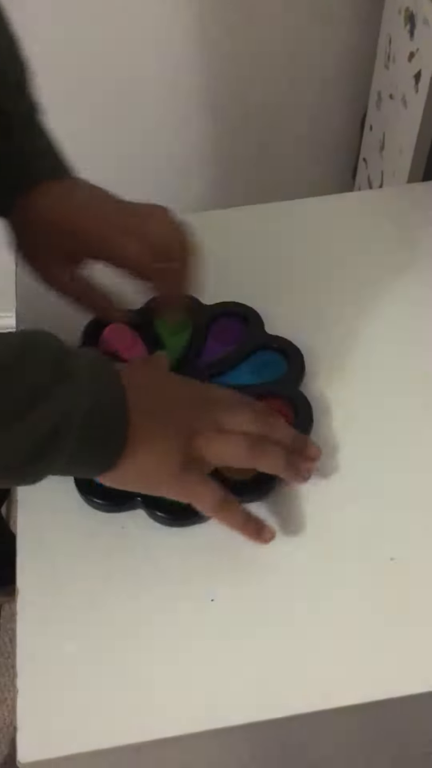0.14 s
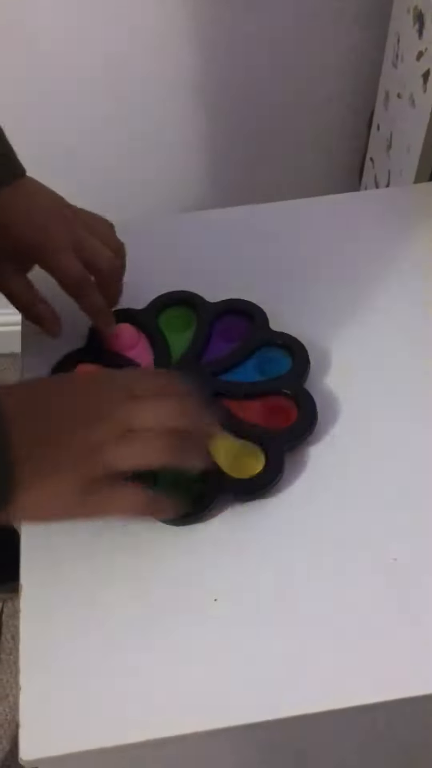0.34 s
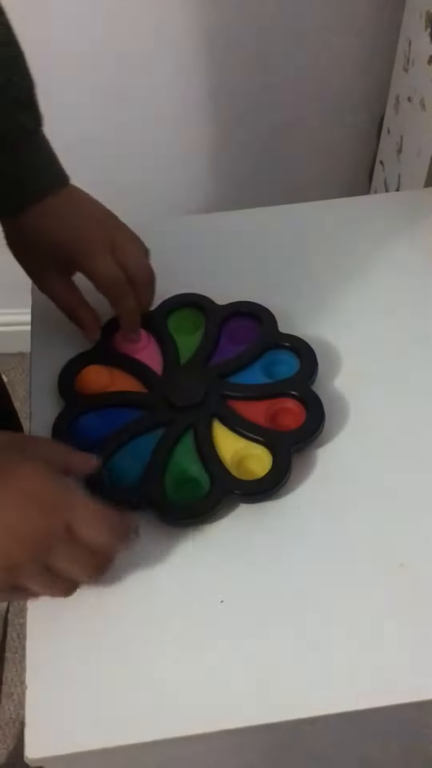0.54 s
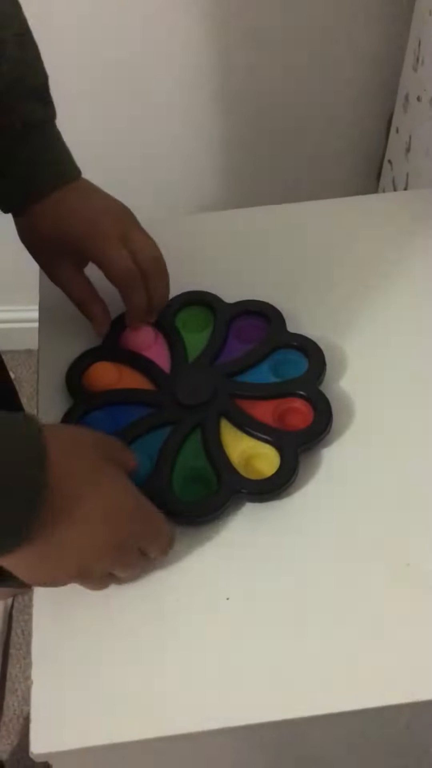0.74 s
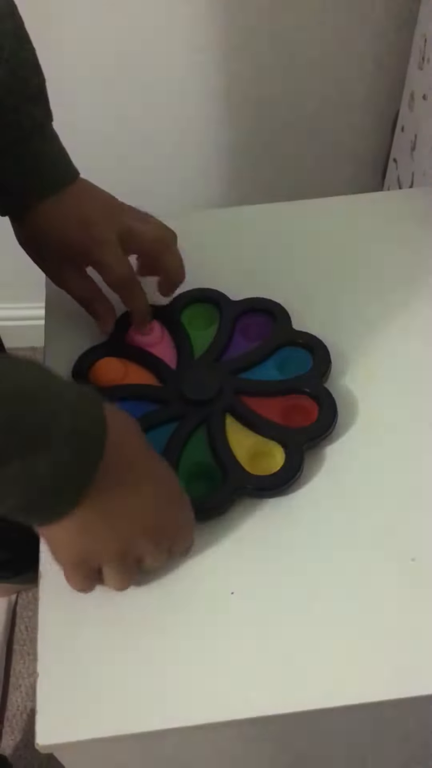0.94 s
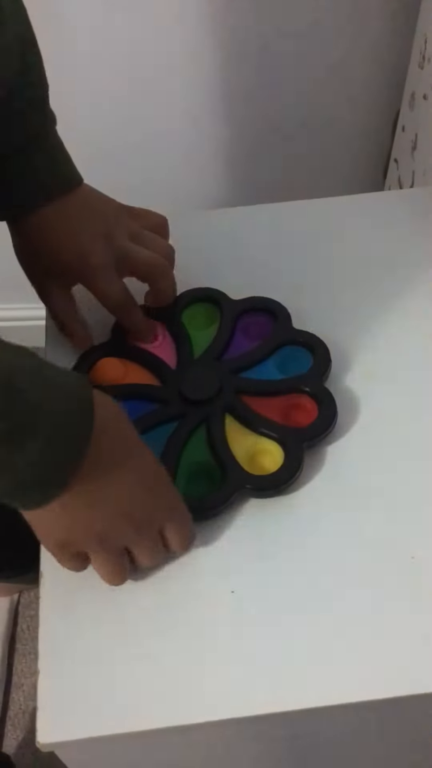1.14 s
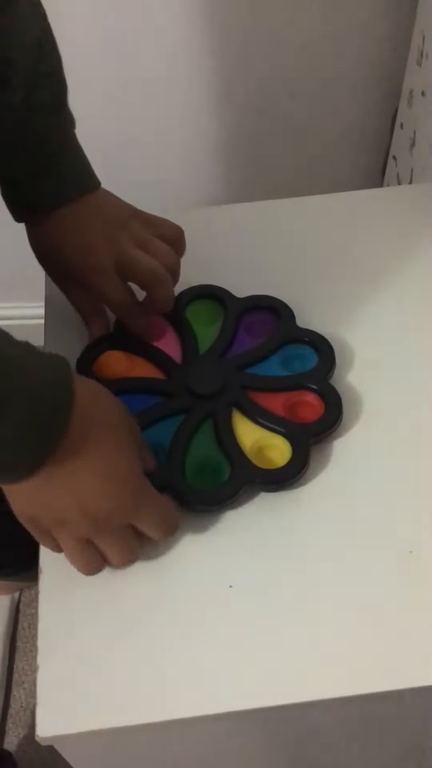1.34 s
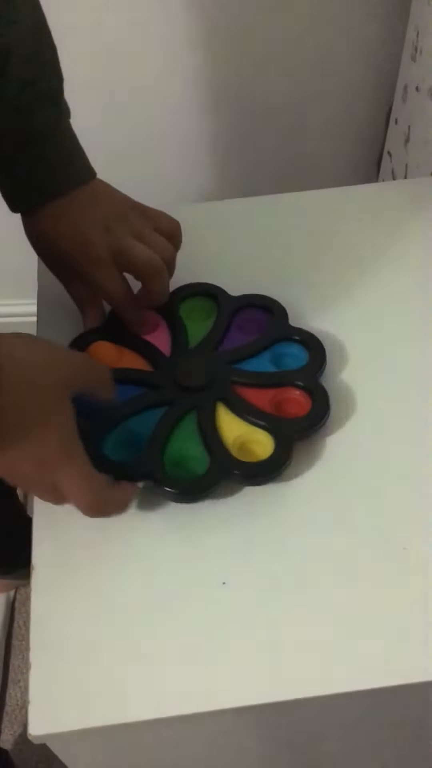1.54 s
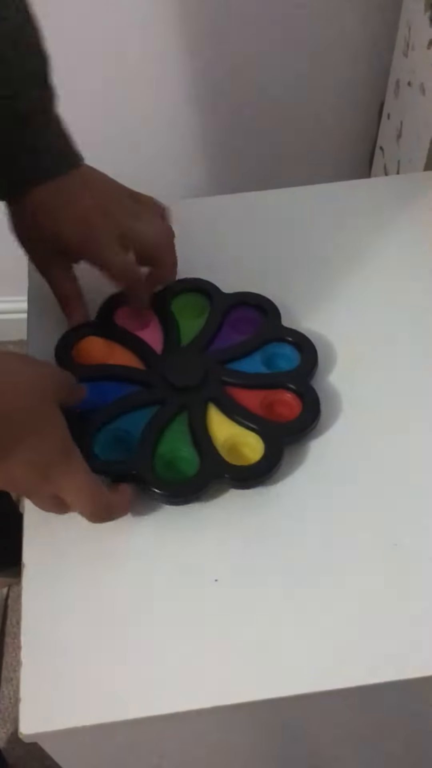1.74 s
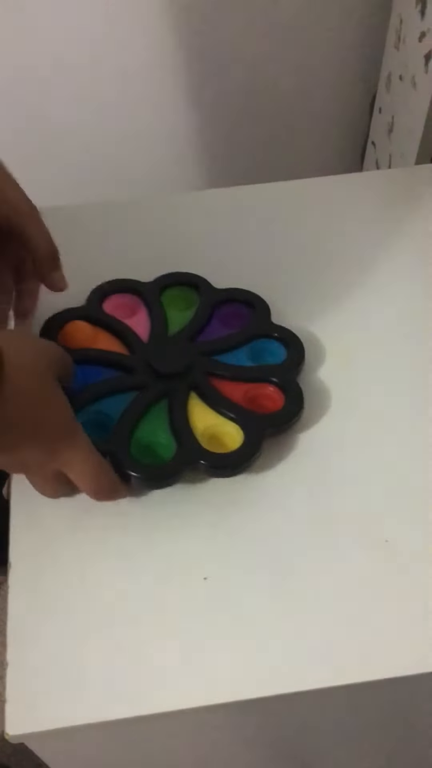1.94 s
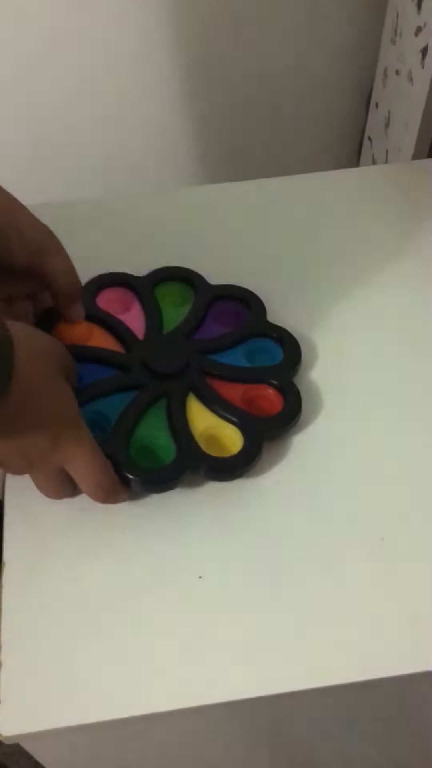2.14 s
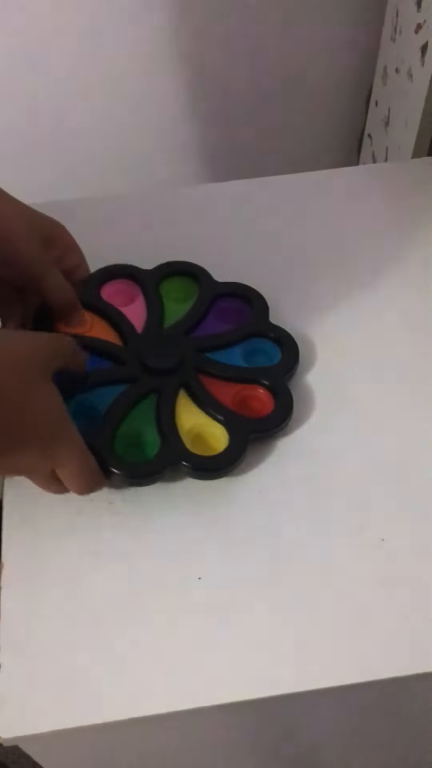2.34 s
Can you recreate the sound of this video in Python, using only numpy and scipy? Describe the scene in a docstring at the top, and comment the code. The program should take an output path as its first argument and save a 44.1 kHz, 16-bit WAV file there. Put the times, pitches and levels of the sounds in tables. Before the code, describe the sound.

Close up indoors, rubbery bubbles snap in an irregular run, early cluster loudest, a near-quiet gap, one strong late pop and quieter last ones; the tabletop booms beneath and skin rubs lightly over faint hiss.

```python
"""Close on a plastic-framed toy lying on a hollow table, in a quiet furnished room, one microphone, 2.5 s.
Room tone and hiss run throughout; the table top faintly hums and skin rubs in filtered noise from the start.
Fingers press silicone bubbles: damped modes pop in a loud flurry at 0.24-0.5 s, softer at 1.0-1.25 s, barely
at 1.75 s, strongly at 2.1 s and quietly near 2.45 s. Noise puffs tick in the frame and decaying low sines
boom in the table around them; faint pops and single slips ring briefly, most often at 1.5-1.9 s."""
import sys
import numpy as np
from scipy import signal
from scipy.fft import rfft, irfft, next_fast_len
from scipy.io import wavfile
from scipy.ndimage import uniform_filter1d

SR = 44100
rng = np.random.default_rng(int(sys.argv[2]) if len(sys.argv) > 2 else 0)


def pcm_store(signal):
    """Save signal as 16-bit PCM."""
    levels = np.round(np.clip(np.atleast_2d(signal), -1, 1) * 32767)
    wavfile.write(sys.argv[1], SR, levels.astype(np.int16).T)


def voltage_ratio(level):
    """Linear amplitude factor for a level in decibels (scalar or array-like)."""
    return 10 ** (np.asarray(level, float) / 20)


N = 110250  # samples, 2.5 s

# Room tone and microphone hiss, spectrum. Each row: frequency in Hz, relative level in dB.
AIR_SPECTRUM = [(20, -37), (33, 0), (146, 2.5), (234, -7.5), (642, -17), (738, -17.5), (1960, -20),
                (9140, -31), (16000, -33)]
AIR_DB = -61  # rms

# The room's diffuse tail. Each row: frequency in Hz, time to fall 60 dB in seconds.
ROOM_T60 = [(400, 0.38), (1400, 0.27), (3700, 0.21), (10000, 0.2)]
ROOM_DB, TICK_ROOM_DB = -11, -13.5  # tail against the direct sound
WALL_S, WALL_DB, WALL_HZ = 0.0095, -14, 2450  # echo off the near wall: delay, level, low-pass corner

# Pushes into the table top. Each row: start in seconds, level in dB, base t60 in seconds,
# lift of the knock and of the modes beside the main note in dB, main note under the hand's load in Hz.
THUMPS = [(.0, -52.5, 1, 1, 135.4), (0.063, -36.5, 0.27, -6.5, 137), (0.2496, -22, 0.4, 5, 135.3),
          (0.4065, -29.5, 0.4, 6, 137.2), (0.506, -24.5, 0.17, 4.5, 146), (0.555, -40.5, 0.41, -7, 134.7),
          (0.725, -43.5, 0.21, 2.5, 131.5), (1.003, -45, 0.32, 7.5, 133), (1.1098, -28, 0.3, 1, 132.4),
          (1.169, -34, 0.18, 5.5, 148), (1.244, -41.5, 0.2, -1, 133.6), (1.531, -45, 0.34, 5.5, 132),
          (1.657, -52.5, 0.56, 3.5, 134), (1.88, -52, 0.58, 0.5, 138), (2.041, -50, 0.71, 9, 134.2),
          (2.45, -43.5, 0.5, 6, 141), (2.481, -36.5, 0.83, -4, 137)]
# Slow modes of the panel, main note first. Each row: ratio to the main note, level in dB, share of t60 and rise.
TABLE_MODES = [(1, 9, 0.89), (0.37, -21.5, 0.11), (1.22, -8.5, 0.9), (1.3, -8.5, 0.49)]
# Quick modes heard at the contact. Each row: frequency in Hz, relative level in dB.
KNOCK_MODES = [(262, -5.5), (420, -10.5), (530, -13), (640, -18)]
# Moments when a hand rests on the panel and stops its ring. Each entry: time in seconds.
LEANS = [.17, 0.616, 1.195, 2.225]
THUMP_RISE_S, LEAN_T60_S = 0.01, 0.17
KNOCK_LEAD_S, KNOCK_T60_S = 0.006, 0.033  # the contact is heard before the panel swells
SHAKE_DB = -68.5  # rms

# Strokes of skin over the toy. Each row: middle in seconds, length between the 1/e points in seconds,
# level in dB, treble lift in dB.
STROKES = [(0.036, 0.15, -49, -4), (0.547, 0.16, -50.5, -4.5), (0.655, 0.027, -64.5, 13.5),
           (0.724, 0.077, -60.5, -27), (0.999, 0.017, -53, 1.5), (1.175, 0.033, -49, -22),
           (1.256, 0.033, -44, 7.5), (1.519, 0.11, -56, 5.5), (1.772, 0.03, -65.5, 4),
           (2.068, 0.052, -51.5, -6), (2.297, 0.085, -60, -5), (2.477, 0.046, -49, 2)]
# Faint pops and single slips, each one short ring at the squeak resonances.
# Each row: start in seconds, peak in dB.
SHORT_RINGS = [(.024, -44), (0.799, -47), (.836, -49), (1.524, -50), (1.552, -52), (1.664, -51.5),
               (1.808, -56), (1.833, -49), (1.857, -57), (1.875, -50)]
# Hiss of skin, spectrum. Each row: frequency in Hz, relative level in dB.
SKIN_SPECTRUM = [(250, 11), (700, -10), (2500, -8), (6000, -14.5), (16000, -24.5)]
# Squeak resonances of the toy. Each row: frequency in Hz, width in Hz, relative level in dB.
SQUEAK_PEAKS = [(1242, 336, 8.5), (2140, 107, 4.5), (2577, 180, -2.5)]
SQUEAK_DB = -2.5  # against the hiss
GRAINS_PER_S, GRAIN_SCATTER_DB = 350, 4

# Hard frame ticking on the table. Each row: start in seconds, level in dB.
TICKS = [(0.0074, -35.5), (0.0623, -39), (0.087, -38), (0.2042, -40.5), (0.246, -24), (0.2577, -20.5),
         (0.2799, -28), (0.4114, -32), (0.4178, -29), (0.512, -18.5), (0.5224, -20), (0.9979, -40.5),
         (1.1024, -21.5), (1.1613, -42), (1.2474, -21), (1.3954, -46.5), (1.4473, -45), (2.037, -38.5),
         (2.086, -37.5), (2.1046, -21), (2.152, -35), (2.4227, -34), (2.482, -32)]
# Resonances of the frame. Each row: frequency in Hz, width in Hz, relative level in dB.
TICK_PEAKS = [(5605, 190, 9), (9020, 440, -1), (11620, 800, 3.5), (14700, 12000, -8.5)]
TICK_RISE_S, TICK_T60_S = 0.00085, 0.02

# Bubbles snapping through, and duller knocks of the frame. Each row: start in seconds, level in dB,
# centre of the snap in Hz, ring t60 at that centre in seconds, lift of the high modes, octave and crack in dB.
POPS = [(0.048, -31, 2850, 0.015, 5.5), (0.0584, -25, 3200, 0.013, -4.5), (0.2426, -11.5, 1776, 0.02, 15),
        (0.2447, -6, 2090, 0.024, 0), (0.275, -16.5, 1500, 0.02, 5), (0.3991, -21.5, 1970, 0.021, 13),
        (0.4016, -16, 1890, 0.034, -8.5), (0.4211, -25, 1490, 0.039, 1), (0.5, -14, 1770, 0.0089, 10.5),
        (0.5009, -16, 1970, 0.051, -2), (1.001, -43, 1580, 0.04, -19), (1.1034, -14.5, 1544, 0.022, 9),
        (1.162, -42, 2260, 0.042, 13), (1.2347, -21, 1880, 0.012, -5.5), (1.254, -23.5, 1410, 0.031, 4.5),
        (1.747, -45, 1920, 0.039, 6.5), (2.04, -40, 1400, 0.032, 10.5), (2.0871, -25.5, 1100, 0.044, -22),
        (2.0993, -8, 1310, 0.023, 7), (2.424, -27, 1177, 0.025, 1), (2.477, -28, 1560, 0.031, 7)]
# Modes the toy rings with. Each row: frequency in Hz, relative level in dB.
SHELL_MODES = [(500, 3), (630, -2), (950, -7), (1070, -2), (1180, 1), (1300, -7), (1390, -9), (1700, -3.5),
               (1880, -3), (2230, -18), (2520, -12.5), (3000, -7.5), (3900, -2)]
# Broad crack of a snap, spectrum. Each row: frequency in Hz, relative level in dB.
CRACK_SPECTRUM = [(700, -35), (2500, 13.5), (5000, -7), (6000, -4.5), (10000, -12.5), (16000, -51.5)]
SNAP_DB, OCTAVE_DB = -14.5, -34.5  # the dome flipping: a short lopsided swing at its own pitch
SNAP_CYCLES, SNAP_RISE_S = 24, 0.0008  # cycles to fall 60 dB; rise of the whole pop
RING_DB, SNAP_OCTAVES = -7.5, 0.75  # a mode this many octaves off centre is 6 dB down
MODE_SCATTER_DB, DETUNE = 1.2, 0.015  # every snap bends the modes a little
HIGH_MODES_HZ, DAMPING_GROWS = 2300, 0.81  # higher modes die sooner, by this power of frequency
CRACK_DB, CRACK_T60_S = -18, 0.01
RATTLE_DB, RATTLE_T60_S, RATTLE_LUMPS_DB = -32, 0.058, 9.5  # the loose frame chatters after a snap

TOP_HZ = 15800  # upper band limit


def unit(x):
    """Scale to rms 1."""
    return x / np.sqrt(np.mean(x ** 2) + 1e-20)


def along(points, hz):
    """Read (Hz, value) points on a log frequency axis."""
    f, v = np.transpose(points)
    return np.interp(np.log(hz + 1), np.log(f + 1), v)


def filtered(x, response):
    """Multiply the spectrum of x by a response of frequency."""
    m = next_fast_len(x.shape[-1] + 8192)
    spectrum = rfft(x, m) * response(np.fft.rfftfreq(m, 1 / SR))
    return irfft(spectrum, m)[..., :x.shape[-1]]


def noise_like(points, length):
    """Noise of rms 1 with a spectrum of (Hz, dB) points."""
    return unit(filtered(rng.standard_normal(length), lambda f: voltage_ratio(along(points, f))))


def resonances(peaks):
    """Causal response of (Hz, width Hz, dB) peaks, alternating in sign."""
    def response(f):
        total = 0
        for k, (centre, width, db) in enumerate(peaks):
            damping = 1j * f * width
            total = total + (-1) ** k * voltage_ratio(db) * damping / (centre ** 2 - f ** 2 + damping)
        return total
    return response


def add(track, s, sound):
    """Mix a sound in at a time in seconds."""
    part = track[max(round(s * SR), 0):][:len(sound)]
    part += sound[:len(part)]


def roomy(sound, wet_db):
    """A short sound followed by a dull echo off the near wall and its own diffuse tail."""
    hz, t, z = signal.stft(rng.standard_normal(SR // 2), SR, nperseg=256)
    fall = voltage_ratio(-60 * t / along(ROOM_T60, hz)[:, None])
    tail = signal.istft(z * fall, SR, nperseg=256)[1]
    delayed_tail = np.pad(tail, (SR // 200, 0))  # 5 ms
    wet = signal.fftconvolve(sound, delayed_tail / np.linalg.norm(tail))
    out = voltage_ratio(wet_db) * wet + np.pad(sound, (0, len(wet) - len(sound)))
    add(out, WALL_S, voltage_ratio(WALL_DB) * filtered(sound, lambda f: 1 / (1 + 1j * f / WALL_HZ)))
    return out


def air():
    """Room tone and microphone hiss: steady shaped noise."""
    return voltage_ratio(AIR_DB) * noise_like(AIR_SPECTRUM, N)


def panel_swell(t, t60, lift_db, note_hz):
    """The panel's low modes swell and die away, each at its own pace."""
    ring = np.zeros(len(t))
    for k, (ratio, db, share) in enumerate(TABLE_MODES):
        level = voltage_ratio(db + lift_db * (k > 0) - 60 * t / (t60 * share))
        rise = 1 - np.exp(-(t / (THUMP_RISE_S * share)) ** 2)
        ring += level * rise * np.sin(2 * np.pi * note_hz * ratio * t)
    return ring


def contact_knock(t):
    """The panel's quick modes, struck at once, die within a moment."""
    knock = np.zeros(len(t))
    for hz, db in KNOCK_MODES:
        level_db = db + MODE_SCATTER_DB * rng.standard_normal()
        knock += voltage_ratio(level_db - 60 * t / KNOCK_T60_S) * np.sin(2 * np.pi * hz * t)
    return knock


def table_top():
    """Each push knocks, then swells the panel until it dies or a hand stops it; handling keeps it shaking."""
    out, t = np.zeros(N), np.arange(SR // 2) / SR
    for s, level_db, t60, lift_db, note_hz in THUMPS:
        stop = min([lean for lean in LEANS if lean > s], default=N / SR) - s
        held = voltage_ratio(level_db - 60 * np.maximum(t - stop, 0) / LEAN_T60_S)
        add(out, s, held * panel_swell(t, t60, lift_db, note_hz))
        knock = voltage_ratio(level_db + lift_db) * contact_knock(t)
        add(out, s - KNOCK_LEAD_S, roomy(knock, ROOM_DB))
    shake_peaks = [(156.0, 4, 1), (55.4, 12, -0.5)]  # Hz, width Hz, dB
    shake = unit(filtered(rng.standard_normal(N), resonances(shake_peaks)))
    return out + voltage_ratio(SHAKE_DB) * shake


def rubbing():
    """Strokes swell a hiss of skin and sparse ringing grains; faint pops and single slips add short rings."""
    t = np.arange(N) / SR
    grains = (rng.random(N) < GRAINS_PER_S / SR) * rng.choice([-1, 1], N)
    grains = grains * voltage_ratio(GRAIN_SCATTER_DB * rng.standard_normal(N))
    hiss = noise_like(SKIN_SPECTRUM, N)
    treble = filtered(hiss, lambda f: 1 / (1 + (3500 / (f + 1)) ** 4))
    skin = hiss + voltage_ratio(SQUEAK_DB) * unit(filtered(grains, resonances(SQUEAK_PEAKS)))

    starts = [round(s * SR) for s, db in SHORT_RINGS]
    impulses = np.bincount(starts, voltage_ratio([db for s, db in SHORT_RINGS]), N)
    ring = filtered(np.arange(SR // 20) == 0, resonances(SQUEAK_PEAKS))
    out = signal.fftconvolve(impulses, ring / abs(ring).max())[:N]
    for s, span, db, lift_db in STROKES:
        swell = voltage_ratio(db) * np.exp(-(2 * (t - s) / span) ** 2)
        out += swell * (skin + (voltage_ratio(lift_db) - 1) * treble)
    return out


def ticks():
    """Thin bright contacts: a puff of noise in the frame's high resonances."""
    out, t = np.zeros(N), np.arange(SR // 16) / SR
    for s, level_db in TICKS:
        grit = unit(filtered(rng.standard_normal(len(t)), resonances(TICK_PEAKS)))
        # 10 dB down leaves headroom for the peaks of the noise
        puff = voltage_ratio(level_db - 10 - 60 * t / TICK_T60_S) * (1 - np.exp(-t / TICK_RISE_S))
        add(out, s, roomy(puff * grit, TICK_ROOM_DB))
    return out


def shell_ring(t, centre_hz, t60, lift_db):
    """The toy's modes ring, strongest near the snap's pitch, the higher ones dying sooner."""
    hz, db = np.transpose(SHELL_MODES)[:, :, None]
    scatter, phase, bend = rng.standard_normal((3, len(SHELL_MODES), 1))
    level = db - 6 * (np.log2(hz / centre_hz) / SNAP_OCTAVES) ** 2
    level = level + lift_db * (hz > HIGH_MODES_HZ) + MODE_SCATTER_DB * scatter
    fall = 60 * t / t60 * (hz / centre_hz) ** DAMPING_GROWS
    turn = 2 * np.pi * hz * (1 + DETUNE * bend) * (t - SNAP_RISE_S) + 0.61 * phase
    return np.sum(voltage_ratio(level - fall) * np.sin(turn), axis=0)


def dome_snap(t, centre_hz, lift_db):
    """The dome flips: a decaying swing made lopsided by its octave."""
    swing = 2 * np.pi * centre_hz * (t - SNAP_RISE_S)
    fall = voltage_ratio(SNAP_DB - 60 * t * centre_hz / SNAP_CYCLES)
    return fall * (np.sin(swing) + voltage_ratio(OCTAVE_DB + lift_db) * np.sin(2 * swing))


def crack_and_rattle(t, lift_db):
    """A broad noise crack, then the loose frame's lumpy, slower chatter."""
    crack = noise_like(CRACK_SPECTRUM, len(t))
    lumps = unit(uniform_filter1d(rng.standard_normal(len(t)), size=SR // 500))  # 2 ms
    burst = voltage_ratio(CRACK_DB + lift_db - 60 * t / CRACK_T60_S)
    chatter = voltage_ratio(RATTLE_DB + RATTLE_LUMPS_DB * lumps - 60 * t / RATTLE_T60_S)
    return (burst + chatter) * crack


def pops():
    """Each snap of a dome rings the toy's modes near its pitch, with a broad crack on top."""
    out, t = np.zeros(N), np.arange(SR // 8) / SR
    rise = 1 - np.exp(-(t / SNAP_RISE_S) ** 2)
    for s, level_db, centre_hz, t60, lift_db in POPS:
        pop = dome_snap(t, centre_hz, lift_db)
        pop = pop + voltage_ratio(RING_DB) * shell_ring(t, centre_hz, t60, lift_db)
        pop = pop + crack_and_rattle(t, lift_db)
        add(out, s, roomy(voltage_ratio(level_db) * pop * rise, ROOM_DB))
    return out


def scene():
    """All sources at the one microphone, mono."""
    return (air() + table_top() + rubbing() + ticks() + pops())[None]


def roll_off(x):
    """The treble ends steeply here."""
    return signal.sosfilt(signal.butter(12, 16550, fs=SR, output="sos"), x)


def record(dry):
    """Roll the mix off steeply at the upper band limit and finish it."""
    mix = filtered(dry, lambda f: 1 / (1 + (f / TOP_HZ) ** 80))
    return roll_off(mix)


dry = scene()
out = record(dry)
pcm_store(out)
```